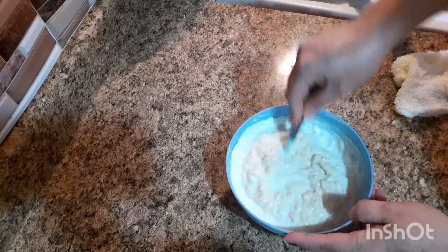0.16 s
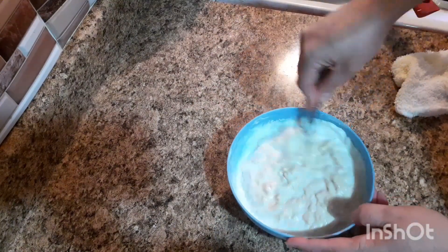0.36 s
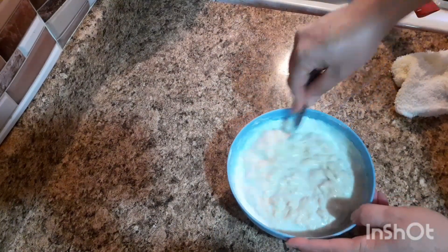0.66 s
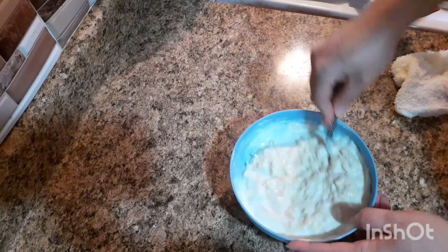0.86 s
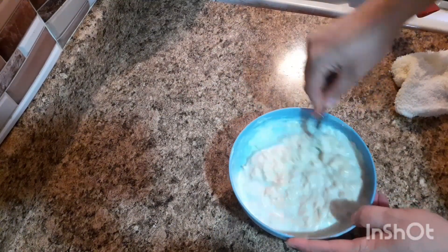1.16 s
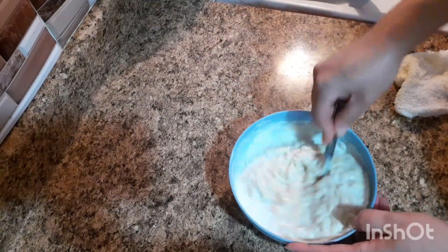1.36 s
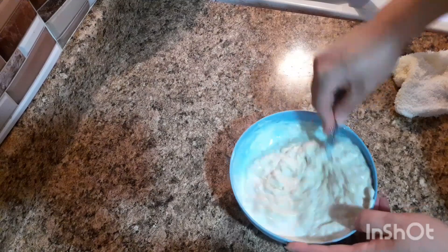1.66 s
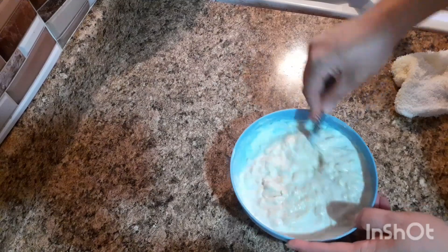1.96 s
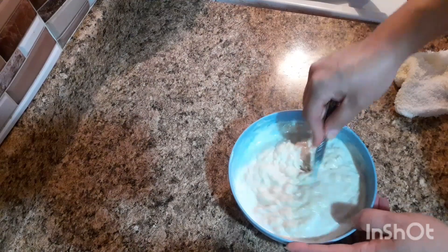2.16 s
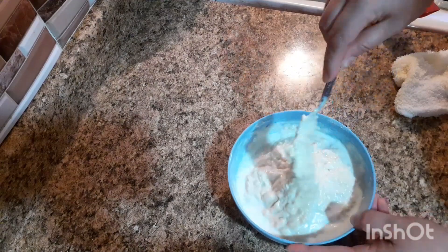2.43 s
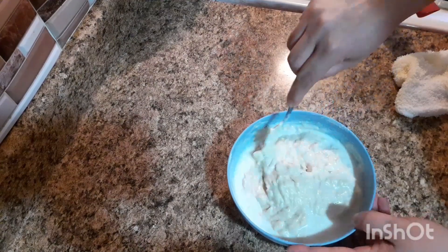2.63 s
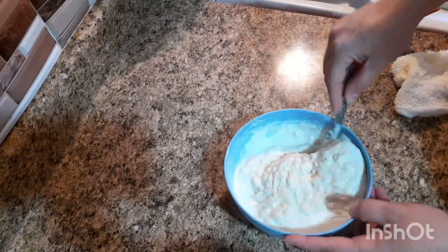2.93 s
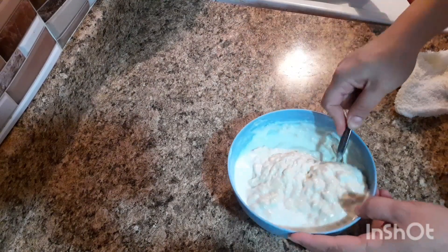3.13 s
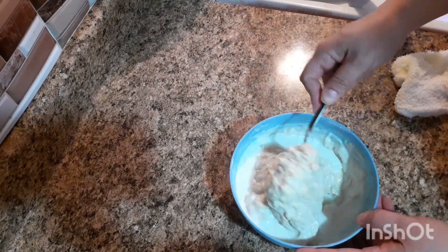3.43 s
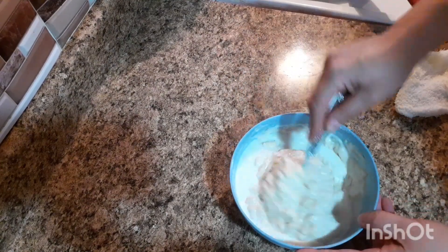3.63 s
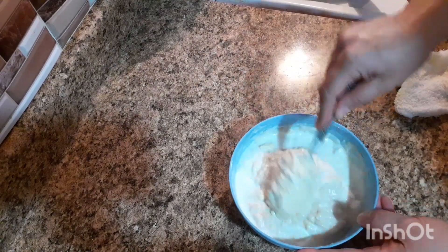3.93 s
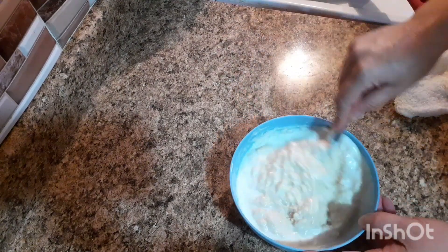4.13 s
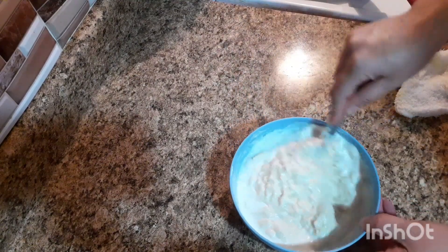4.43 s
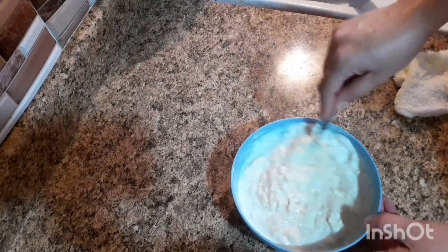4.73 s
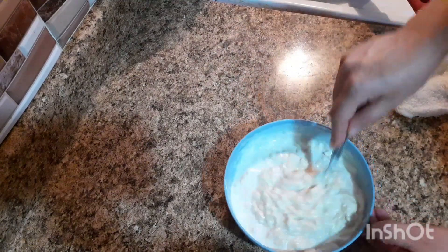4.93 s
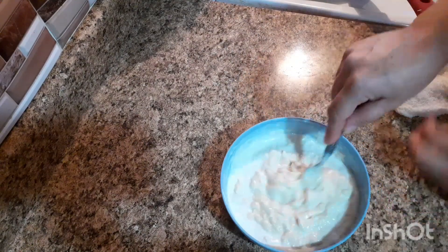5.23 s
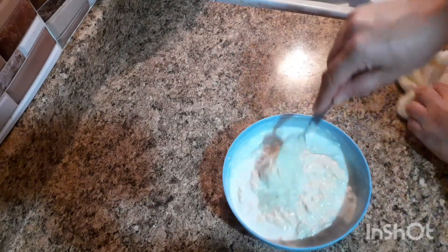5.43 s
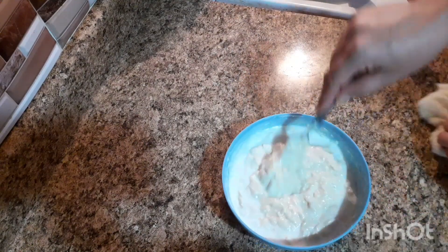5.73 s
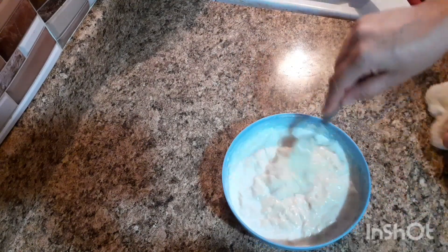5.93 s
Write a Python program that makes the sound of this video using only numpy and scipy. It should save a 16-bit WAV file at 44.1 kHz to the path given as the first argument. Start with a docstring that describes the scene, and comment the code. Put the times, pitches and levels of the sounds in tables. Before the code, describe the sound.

A metal spoon quickly stirs thick, wet batter in a plastic bowl, squelching and hissing along the wall, then slows to sparse folds with dull thumps.

```python
"""In a small, hard kitchen a metal spoon stirs thick batter in a plastic bowl held on a stone counter.
Eight quick turns plough through the batter and hiss along the wall; a long scoop and slower folds follow.
Friction is noise made of fine slips; the squelch is bursting air pockets filtered by a moving hollow.
Damped modes make the bowl's thumps, filtered noise bursts the spoon's ticks and the larger plops.
Reflections, soft air noise and the faint hum of an appliance surround them."""
import sys
import numpy as np
from scipy import signal
from scipy.fft import rfft, irfft
from scipy.io import wavfile
from scipy.ndimage import uniform_filter1d

SR = 44100
rng = np.random.default_rng(int(sys.argv[2]) if len(sys.argv) > 2 else 0)


def unload_wav(signal):
    """Save mono or channel-first audio to the path in sys.argv[1] as 16-bit WAV at rate SR, clipped to [-1, 1]."""
    wavfile.write(
        sys.argv[1],
        SR,
        np.round(np.clip(np.atleast_2d(signal).T, -1, 1) * 32767).astype(np.int16),
    )


N = 268128
TIME = np.arange(N) / SR
BINS_HZ = np.maximum(np.arange(N // 2 + 1) * SR / N, 1)


def from_db(db):
    """Level law: decibels become an amplitude gain."""
    return 10 ** (np.asarray(db) / 20)


def rms_one(x):
    """Normalization: the signal is scaled to rms 1."""
    return x / np.sqrt(np.mean(x ** 2) + 1e-20)


def at_hz(points, hz=BINS_HZ):
    """Logarithmic pitch: a table is interpolated on a log-frequency axis."""
    f, value = np.transpose(points)
    return np.interp(np.log(hz), np.log(f), value)


def drift(rate_hz):
    """Low-pass noise: a slow random wander of rms 1."""
    spectrum = rfft(rng.standard_normal(N)) / (1 + (BINS_HZ / rate_hz) ** 2)
    return rms_one(irfft(spectrum, N))


# left-right coherence of the noises: (frequency [Hz], correlation [1])
COHERENCE = [(60, .97), (200, .88), (420, 0.5), (600, 0.79), (850, 0.42), (1600, 0.095), (4000, 0),
             (15000, 0)]


def colour(pair, points, lift_db=0):
    """Partial coherence: two unrelated signals become one coloured stereo sound whose mean has rms 1."""
    mid, side = rfft(pair)
    alike = np.clip(at_hz(COHERENCE), -1, 1)
    octaves_outside = np.abs(np.log2(BINS_HZ / np.clip(BINS_HZ, points[0][0], points[-1][0])))
    # beyond the table the spectrum falls by a further 23 dB per octave
    gain = from_db(at_hz(points) + lift_db - 23 * octaves_outside)
    common = np.sqrt(1 + alike) * mid
    opposed = np.sqrt(1 - alike) * side * [[1], [-1]]
    x = irfft(gain * (common + opposed), N)
    return x / np.std(x.mean(axis=0))


# resonances that tint all rubbing: (frequency [Hz], width [Hz], lift [dB])
RUBBING_RESONANCES = [(1157, 50, 5), (1619, 50, 5), (1784, 90, 5), (2222, 50, 4), (2505, 70, 4),
                      (5400, 200, 3), (6200, 250, 3), (8200, 250, 4), (12500, 500, 3)]


def tint():
    """Resonance: bowl and spoon lift narrow bands, given in dB at each frequency."""
    return sum(db / (1 + (2 * (BINS_HZ - hz) / width) ** 2) for hz, width, db in RUBBING_RESONANCES)


def grains(per_s, spread_db):
    """Random impulse process: tiny snaps of uneven size, with independent left and right strengths."""
    born = rng.random(N) < per_s / SR
    size_db = spread_db * np.minimum(rng.exponential(1, N), 4)
    return born * from_db(size_db) * rng.standard_normal((2, N))


def patchy(x, depth_db, size=5):
    """Changing modal coupling: the moving contact favours other resonances in brief, narrow swells."""
    frames = signal.stft(x, SR, nperseg=512)[2]
    chance = rng.standard_normal(frames.shape[1:])
    chance = uniform_filter1d(uniform_filter1d(chance, size, axis=0), size, axis=1)
    x = signal.istft(frames * from_db(depth_db * rms_one(chance)), SR)[1][:, :N]
    return x / np.std(x.mean(axis=0))


def ring(clicks, modes):
    """Modal decay: clicks excite exponentially damped sines, of alternating sign."""
    out = np.zeros(N)
    for k, (hz, db, t60) in enumerate(modes):
        r = np.exp(-np.log(1000) / (t60 * SR))
        w = 2 * np.pi * hz / SR
        mode = signal.lfilter([0, np.sin(w)], [1, -2 * r * np.cos(w), r * r], clicks + 1e-18)
        out += (-1) ** k * from_db(db) * mode
    return out


def resonate(x, hz, width_hz):
    """Two-pole resonance: one band passes with a gain near 1 at its peak."""
    r = np.exp(-np.pi * width_hz / SR)
    poles = [1, -2 * r * np.cos(2 * np.pi * hz / SR), r * r]
    return signal.lfilter(np.array([1, 0, -1]) * (1 - r * r) / 2, poles, x)


def add(track, s, sound):
    """Superposition: a sound is mixed into the track at a time in seconds."""
    start = max(int(s * SR), 0)
    part = sound[..., :N - start]
    track[..., start:start + part.shape[-1]] += part


def stroke(start, length, attack_share, sag_db_per_s, release_db_per_s):
    """Force envelope: the gain builds over a share of the length, sags, then dies as the spoon lets go."""
    t = np.maximum(TIME - start, 0)
    fall_db = sag_db_per_s * t + release_db_per_s * np.maximum(t - length, 0)
    return np.minimum(t / (attack_share * length), 1) * from_db(-np.minimum(fall_db, 200))


# the spoon ploughs through the middle of the batter:
# (time [s], length [s], batter level [dB], hiss level [dB], hollow [Hz], hollow lift [dB])
PLOUGHING = [(-0.01, 0.21, -50.5, -54.5, 1880, 5), (0.311, 0.15, -47.5, -51.5, 1730, 3),
             (0.58, 0.16, -48.5, -54, 1540, 6), (0.84, 0.2, -49.5, -53.5, 1510, 0),
             (1.117, 0.14, -50.5, -50, 1280, 10), (1.43, .11, -50.5, -57.5, 1180, 10),
             (1.692, 0.13, -49, -52.5, 1290, 13), (1.989, 0.12, -54, -55.5, 1370, 7),
             (3.787, 0.016, -61, -65, 1510, 7), (4.16, 0.044, -74, -93, 1750, 3),
             (4.235, 0.27, -76, -105, 1230, 12), (4.579, 0.039, -56, -66, 1400, 17.5),
             (4.879, 0.0067, -50.5, -67, 2200, 8), (5.762, 0.35, -67, -94, 1880, 7)]


def drags(wall_db=-12.5):
    """Viscous drag: deep strokes load the batter; the wall flexes at a level relative to it."""
    for s, length, batter_db, hiss_db, hz, lift_db in PLOUGHING:
        gain = stroke(s, length, attack_share=0.61, sag_db_per_s=18, release_db_per_s=218)
        batter = gain * from_db(batter_db)
        yield gain * from_db(hiss_db), batter, batter * from_db(wall_db), hz, lift_db


# the spoon's edge sweeps along the wall: (time [s], length [s], hiss level [dB], batter level [dB])
WALL_SWEEPS = [(0.0, 0.0041, -48, -57), (0.164, 0.12, -42, -52), (0.367, 0.033, -54, -67),
               (0.466, 0.086, -41.5, -53), (0.623, 0.033, -51.5, -61), (0.717, 0.1, -41.5, -53.5),
               (1.001, 0.11, -45, -57.5), (1.273, 0.064, -41, -48), (1.43, 0.061, -53.5, -63),
               (1.558, 0.056, -42.5, -51), (1.825, 0.064, -46.5, -58.5), (2.097, 0.03, -47, -54),
               (2.989, 0.021, -56.5, -63), (3.044, 0.14, -77, -85), (3.724, 0.036, -56.5, -66),
               (4.07, 0.032, -65.5, -66), (4.152, 0.0095, -65.5, -63), (4.31, 0.044, -81.5, -89),
               (4.613, 0.067, -55, -67.5), (4.838, 0.082, -63.5, -61), (4.954, 0.062, -64.5, -65),
               (5.031, 0.14, -70, -76), (5.208, .27, -69.5, -79.5)]
# against the wall the hollow is small and shallow
SWEEP_HOLLOW_HZ, SWEEP_LIFT_DB = 2090, -0.5


def sweeps(wall_db=-10.5):
    """Sliding friction: the edge hisses on the wall and pushes some batter along."""
    for s, length, hiss_db, batter_db in WALL_SWEEPS:
        gain = stroke(s, length, attack_share=0.33, sag_db_per_s=7, release_db_per_s=288)
        batter = gain * from_db(batter_db)
        yield gain * from_db(hiss_db), batter, batter * from_db(wall_db), SWEEP_HOLLOW_HZ, SWEEP_LIFT_DB


# one long scoop, levels before the gains below:
# (time [s], batter level [dB], hiss level [dB], wall level [dB], hollow [Hz])
LONG_SCOOP = [(2.695, -55, -65, -42, 1150), (2.715, -57.5, -72, -50, 1100), (2.737, -53, -66, -45, 1160),
              (2.775, -55, -59, -64, 1280), (2.807, -51, -59, -48.5, 1400),
              (2.899, -39.5, -51.5, -54, 1890), (2.983, -48, -61.5, -59.5, 1500),
              (3.013, -51, -61, -52, 1570), (3.073, -50.5, -65, -83, 1490), (3.15, -86, -82, -85, 1690)]


def scoop(batter_gain_db=-1.2, hiss_gain_db=-1.5, wall_gain_db=-2.5, lift_db=9.5, release_db_per_s=145):
    """Changing cavity: lifting and folding the batter moves its levels and the pitch of its hollow."""
    s, *columns = np.transpose(LONG_SCOOP)
    batter_db, hiss_db, wall_db, hz = [np.interp(TIME, s, c) for c in columns]
    scooping = (TIME > s[0]) * from_db(-release_db_per_s * np.clip(TIME - s[-1], 0, 1))
    hiss = scooping * from_db(hiss_db + hiss_gain_db)
    batter = scooping * from_db(batter_db + batter_gain_db)
    return hiss, batter, scooping * from_db(wall_db + wall_gain_db), hz, lift_db


def stirring(film_db=-89.0):
    """Incoherent addition: movements add in power; the one shifting most batter shapes the hollow."""
    film = from_db(film_db)   # the spoon never quite rests
    resting = (film, film, film, SWEEP_HOLLOW_HZ, SWEEP_LIFT_DB)
    hisses, batters, walls, hollows_hz, lifts_db = zip(resting, *drags(), *sweeps(), scoop())
    hiss, batter, flex = [np.sqrt(sum(g ** 2 for g in gains)) for gains in (hisses, batters, walls)]

    def weighted(values):
        """Power weighting: each movement counts by its batter power."""
        return sum(b ** 2 * v for b, v in zip(batters, values)) / batter ** 2

    return hiss, batter, flex, weighted(hollows_hz), weighted(lifts_db)


# spectrum of the fine slips: (frequency [Hz], level [dB])
SLIP_SPECTRUM = [(2470, -43), (4200, -4), (5210, 2), (5670, -2), (6160, 0), (6650, -2), (7110, 1),
                 (8350, 1), (9810, -1), (12600, -1), (15100, -2.5), (15800, -4)]
# spectrum of the coarser catches: (frequency [Hz], level [dB])
CATCH_SPECTRUM = [(1500, -11), (2200, -8), (2550, 0), (2900, -2.5), (3250, -0.5), (3900, -3.5), (4600, -5),
                  (5400, -10.5)]


def scrape(hiss, batter, hiss_db=-2.0, grit_db=-5.0, grit_follows_batter=0.47, judder_db=1.28):
    """Stick-slip friction: the edge makes fine slips, and coarser catches under a load of batter."""
    slips = colour(grains(per_s=22000, spread_db=2.0), SLIP_SPECTRUM, tint())
    catches = colour(grains(per_s=3500, spread_db=1.5), CATCH_SPECTRUM, tint())
    grit = hiss * (batter / hiss) ** grit_follows_batter
    fine = from_db(hiss_db) * hiss * patchy(slips, depth_db=3.0)
    coarse = from_db(grit_db) * grit * patchy(catches, depth_db=4.0)
    return (fine + coarse) * from_db(judder_db * drift(31))


# spectrum of the bursting pockets before the hollow: (frequency [Hz], level [dB])
POP_SPECTRUM = [(500, -2), (800, 2.5), (1200, 1.5), (1800, 1.5), (2400, -2), (3000, -10), (4500, -18)]


def squelch(batter, hollow_hz, lift_db, gain_db=-3.0, clump_db=1.5, hollow_octaves=0.26):
    """Cavity resonance: air pockets tear open and sound through the changing hollow behind the spoon."""
    pops = patchy(colour(grains(per_s=1800, spread_db=0.5), POP_SPECTRUM, tint()), depth_db=4.0)
    hz, s, frames = signal.stft(pops, SR, nperseg=512)
    octaves_off = np.log2((hz[:, None] + 1) / np.interp(s, TIME, hollow_hz))
    hollow = from_db(np.interp(s, TIME, lift_db) / (1 + (octaves_off / hollow_octaves) ** 2))
    pops = signal.istft(frames * hollow, SR)[1][:, :N]
    # the hollow sets the colour; the batter gain and random clumping set the loudness
    pops = pops / np.sqrt(uniform_filter1d(pops.mean(axis=0) ** 2, size=1500))
    return pops * batter * from_db(gain_db + clump_db * drift(52))


# the bowl's low shudder as the hand bears on it, before its gain: (time [s], level [dB])
SHUDDER_LEVEL = [(0, -59), (0.35, -54.5), (0.62, -61), (0.9, -54.5), (1.2, -63.5), (1.8, -56), (2.3, -71.5),
                 (2.9, -91), (3.08, -59), (3.62, -88), (3.95, -69.5), (4.3, -59.5), (4.75, -67),
                 (5.05, -60.5), (5.7, -80), (6.08, -83)]
# spectrum of the shaken bowl: (frequency [Hz], level [dB])
BOWL_SPECTRUM = [(28, -22), (60, -15), (90, -2), (125, 5), (190, 2.5), (245, -1.5), (310, -37)]
# spectrum of the flexing wall: (frequency [Hz], level [dB])
WALL_SPECTRUM = [(270, -44), (320, 4.5), (400, 9.5), (470, 1.5), (560, -6), (660, -4), (760, -1.5),
                 (900, -6)]
# modes of the wall, also rung by bumps: (frequency [Hz], level [dB], decay t60 [s])
WALL_RINGING = [(338.5, -6.5, 0.058), (404.6, -10, 0.12), (456.5, -15, 0.14), (509.4, -16.5, 0.19),
                (565, -20.5, 0.2), (673.5, -17, 0.12), (703, -42.5, 0.025), (970, -22.5, 0.033)]


def shudder(flex, bowl_gain_db=-1.0, flex_share_db=0.5):
    """Forced vibration: stick and slip shake the bowl and flex its wall, which favours its own modes."""
    shake = from_db(np.interp(TIME, *np.transpose(SHUDDER_LEVEL)) + bowl_gain_db)
    modes_db = sum(4 / (1 + ((BINS_HZ - hz) / 12) ** 2) for hz, db, t60 in WALL_RINGING)
    bowl = colour(grains(900, spread_db=1.5), BOWL_SPECTRUM) * np.hypot(shake, from_db(flex_share_db) * flex)
    wall = colour(grains(900, spread_db=3.0), WALL_SPECTRUM, modes_db) * flex
    return bowl + wall


# larger air pockets bursting in the batter, before the gain: (time [s], peak level [dB], pitch [Hz])
POCKETS = [(0.158, -44, 2150), (0.715, -44, 1680), (1.008, -37, 1750), (1.815, -37, 1220),
           (2.07, -42, 1210), (2.689, -32.5, 670), (2.724, -32, 680), (2.734, -33, 1340),
           (2.753, -37.5, 1520), (2.846, -32, 1530), (2.902, -31, 1770), (4.077, -47.5, 940),
           (4.157, -37.5, 1740), (4.584, -52, 1350), (4.886, -44, 1530)]


def plops(gain_db=-2.0, tear_s=0.0064, outer_mouth_db=-1.5):
    """Coupled resonators: a torn pocket rings in its cavity and, lower, in its open mouth."""
    out = np.zeros((2, N))
    t = TIME[:SR // 10]
    for s, db, hz in POCKETS:
        # one noise common to both sides, one separate for each
        noise = rng.standard_normal(len(t)) + 0.83 * rng.standard_normal((2, len(t)))
        tear = noise * np.exp(-t / tear_s)
        inner = resonate(tear, hz, .25 * hz)
        outer = resonate(tear, .75 * hz, .2 * hz)
        cavity = resonate(inner - from_db(outer_mouth_db) * outer, .9 * hz, .6 * hz)
        add(out, s, from_db(db + gain_db) * cavity / np.abs(cavity).max())
    return out


# bowl bumping on the counter, before the gains:
# (time [s], level [dB], pitch [Hz], wall ring relative to the bump [dB])
BUMPS = [(0.043, -47.5, 189, -4), (0.205, -39.5, 132, -38), (0.232, -38.5, 180, -24),
         (0.357, -43, 167, -12), (0.477, -37.5, 144, -33), (0.741, -36.5, 150, -21),
         (0.785, -45.5, 140, -9), (1.036, -34, 136.5, -28), (1.29, -38, 171, -23), (1.336, -29, 156, -41),
         (1.398, -34, 143, -37), (1.586, -39, 155, -27), (1.654, -32, 138, -37), (1.858, -39, 130, -34),
         (2.137, -46, 146, -12), (2.686, -24.5, 208, -5), (2.991, -31.5, 147, -19),
         (3.271, -43.5, 132, -23), (3.312, -41.5, 129, -19), (3.336, -35, 169.5, -20),
         (3.731, -26, 153, -21), (4.075, -30, 160, -11), (4.151, -46.5, 177, -4), (4.588, -42, 139, -10),
         (4.865, -31.5, 155, -21.5), (4.888, -25, 170, -25), (4.901, -30.5, 133, -17.5),
         (4.978, -39, 137, -16), (5.441, -40.5, 94, -27), (5.467, -41, 88, -24)]
# low modes that a bump sets ringing: (frequency [Hz], level [dB], decay t60 [s])
BOWL_RINGING = [(132, -21, .2), (178, -25, .15), (246, -30, .12)]


def thumps(gain_db=3.0, swell_s=0.0097, damping=5.1, wall_gain_db=0.5, lowest_hz=90):
    """Damped oscillation: the loaded bowl rocks for a few cycles and its modes ring on faintly."""
    out, bumps, contacts = np.zeros((3, N))
    t = TIME[:SR // 10]
    swell = (t / swell_s * np.exp(1 - t / swell_s)) ** damping
    for s, db, hz, wall_db in BUMPS:
        add(out, s, from_db(db) * swell * np.cos(2 * np.pi * hz * (t - swell_s)))
        add(bumps, s + swell_s, from_db([db]))
        add(contacts, s + 0.00382, from_db([db + wall_db + wall_gain_db]))
    out = out + ring(bumps, BOWL_RINGING) + ring(contacts, WALL_RINGING)
    # the thumps carry little below 90 Hz
    return from_db(gain_db) * signal.sosfilt(signal.butter(2, lowest_hz, "high", fs=SR, output="sos"), out)


# spoon ticking on the bowl, before the gain: (time [s], level [dB], brightest pitch [Hz])
SPOON_TICKS = [(0.374, -31.5, 5190), (1.573, -24.5, 8700), (2.01, -41.5, 4810), (2.1037, -35, 5050),
               (2.2478, -45.5, 4470), (2.3138, -52.5, 7400), (2.366, -53, 7600), (3.0025, -34, 4850),
               (3.157, -60, 9000), (3.7285, -26, 6000), (4.0776, -60, 2630), (4.8495, -42, 5000),
               (4.8865, -35, 2860)]
# spectrum of the snap: (frequency [Hz], level [dB])
SNAP_SPECTRUM = [(1000, 6.5), (3000, -0.5), (5500, 6.5), (8000, 6), (12000, 8.5), (16000, 13)]


def ticks(gain_db=-8.0, snap_s=0.0032):
    """Impact: metal on plastic gives a bright snap and a short ring, smothered by the batter."""
    out = np.zeros((2, N))
    t = TIME[:SR // 10]
    bright = colour(rng.standard_normal((2, N)), SNAP_SPECTRUM)
    for k, (s, db, hz) in enumerate(SPOON_TICKS):
        snap = bright[:, k * len(t):(k + 1) * len(t)]
        snap = signal.sosfilt(signal.butter(1, min(2 * hz, .45 * SR), fs=SR, output="sos"), snap)
        snap = rms_one(snap + 1.5 * resonate(snap, hz, .25 * hz))
        add(out, s, from_db(db + gain_db) * snap * np.exp(-t / snap_s))
    return out


# reverberation of the kitchen: (frequency [Hz], decay t60 [s])
REVERBERATION = [(100, 0.36), (500, 0.42), (2000, 0.25), (8000, 0.19), (16000, 0.046)]


def kitchen(x):
    """Diffuse reverberation: tiles and cupboards return a noise-like tail whose treble dies first."""
    white = colour(rng.standard_normal((2, N)), [(20, 0), (SR / 2, 0)])[:, :SR // 2]
    hz, s, frames = signal.stft(white, SR, nperseg=256)
    decay = np.exp(-np.log(1000) * s / at_hz(REVERBERATION, hz + 1)[:, None])
    tail = signal.istft(frames * decay, SR)[1]
    tail = tail * np.minimum(TIME[:tail.shape[1]] / 0.006, 1)   # builds over 6 ms
    return signal.fftconvolve(x, tail / np.sqrt(np.sum(tail ** 2) / 2), axes=1)[:, :N]


# spectrum of the air noise: (frequency [Hz], level [dB])
AIR_SPECTRUM = [(25, -39), (36, -32), (48, -30), (59, -1), (82, -10.5), (118, 4.5), (200, -40.5),
                (300, -13.5), (450, -24), (620, -21.5), (850, -26), (1400, -26.5), (2200, -35.5),
                (5000, -42.5), (9500, -34.5), (15800, -33)]
# appliance hum, before the left-right balance: (frequency [Hz], rms level [dB])
HUM_LINES = [(59, -67), (119, -76.5), (479, -89.5), (600, -85.5), (1075, -89.5), (1320, -87)]


def room_tone(air_db=-71.0, left_db=4.0):
    """Stationary background: soft air noise and the faint, slightly unsteady lines of an appliance motor."""
    air = from_db(air_db) * colour(rng.standard_normal((2, N)), AIR_SPECTRUM)
    hum = 0
    for hz, db in HUM_LINES:
        phase = 2 * np.pi * hz * TIME + np.sqrt(hz / 400) * drift(10)
        hum = hum + np.sqrt(2) * from_db(db) * np.sin(phase)
    # the left is raised and the right lowered by the same amount
    return (air + hum) * from_db([[left_db], [-left_db]])


# how much louder the bowl is on the left than on the right: (frequency [Hz], difference [dB])
LEFT_EXCESS = [(100, 6.5), (600, 7.5), (1050, 3.5), (1500, 6.5), (2400, 5), (4000, 1.5), (8000, 7),
               (15000, 6.5)]


def scene(rub_room_db=-10.0, thump_room_db=-14.0, tick_room_db=-8.0):
    """Direct and reverberant field: the bowl is close by, stronger on the left, in a small hard room."""
    hiss, batter, flex, hollow_hz, lift_db = stirring()
    rubbing = scrape(hiss, batter) + squelch(batter, hollow_hz, lift_db) + shudder(flex)
    bumps = thumps()
    clicks = ticks() + plops()
    sent = from_db(rub_room_db) * rubbing + from_db(thump_room_db) * bumps + from_db(tick_room_db) * clicks
    near = rubbing + bumps + clicks + kitchen(sent)
    sides = from_db(at_hz(LEFT_EXCESS) / 2 * [[1], [-1]])
    return irfft(rfft(near) * sides / sides.mean(axis=0), N) + room_tone()


def record(dry, low_hz=40.2, cutoff_hz=15900):
    """Band limitation: the microphone sheds the deep bass and the top is cut steeply."""
    x = signal.sosfilt(signal.butter(2, low_hz, "high", fs=SR, output="sos"), dry)
    return signal.sosfilt(signal.ellip(12, .1, 80, cutoff_hz, fs=SR, output="sos"), x)


dry = scene()
out = record(dry)
unload_wav(out)
```